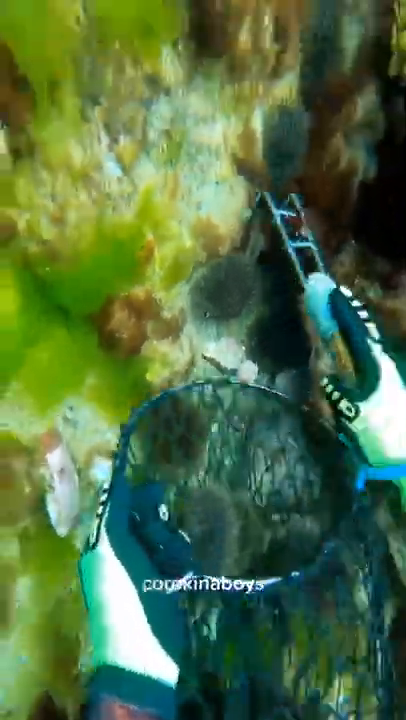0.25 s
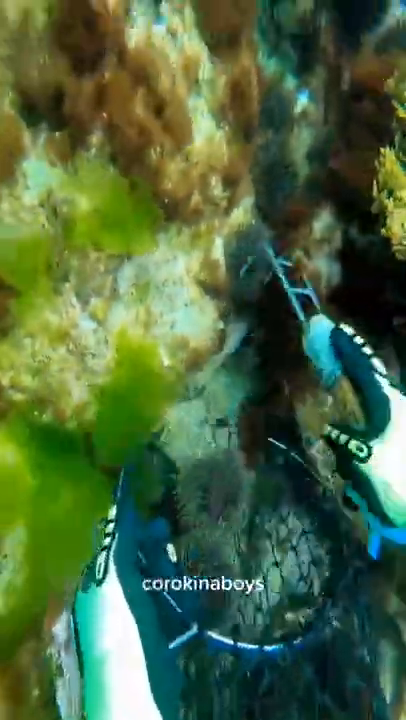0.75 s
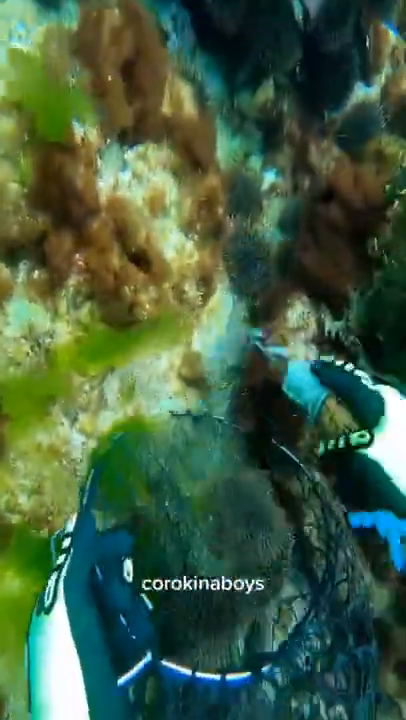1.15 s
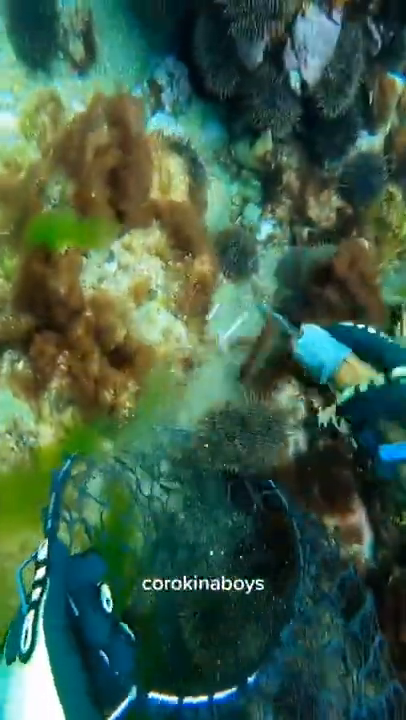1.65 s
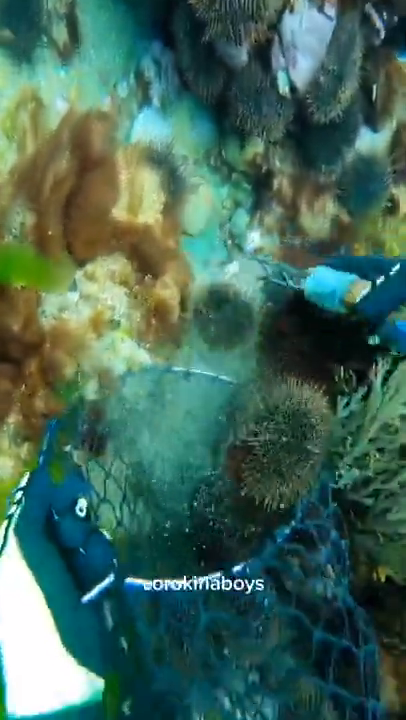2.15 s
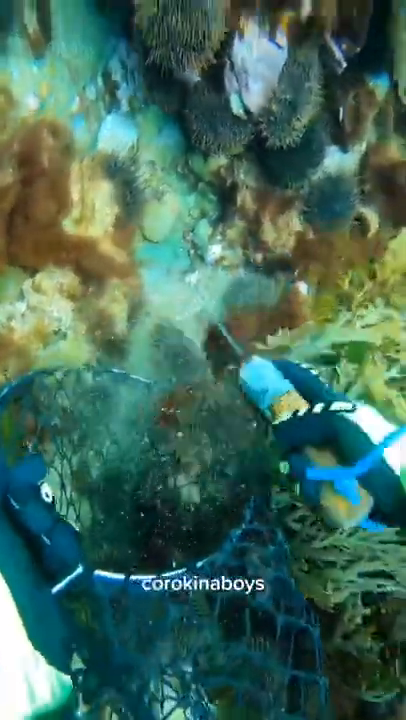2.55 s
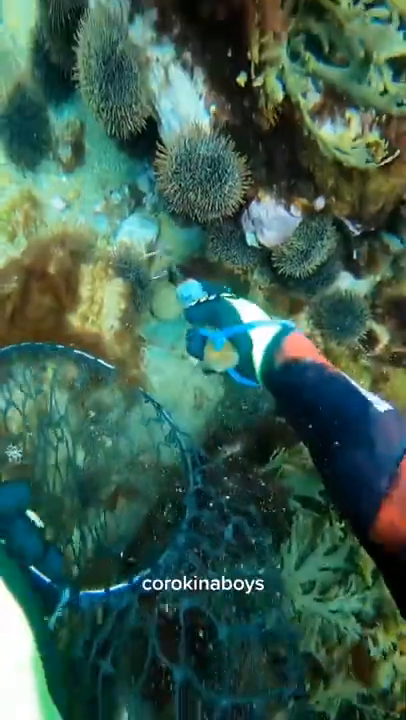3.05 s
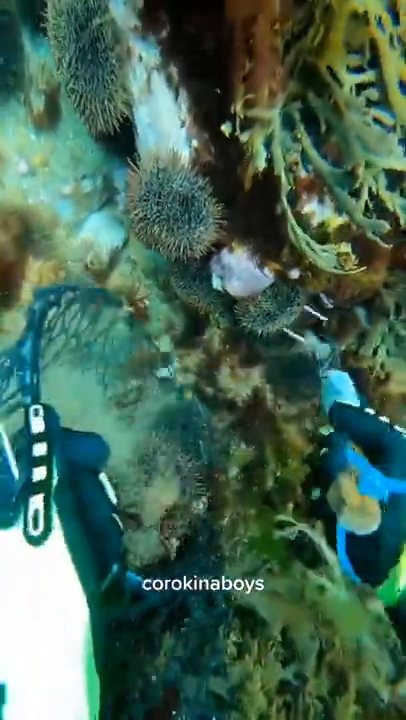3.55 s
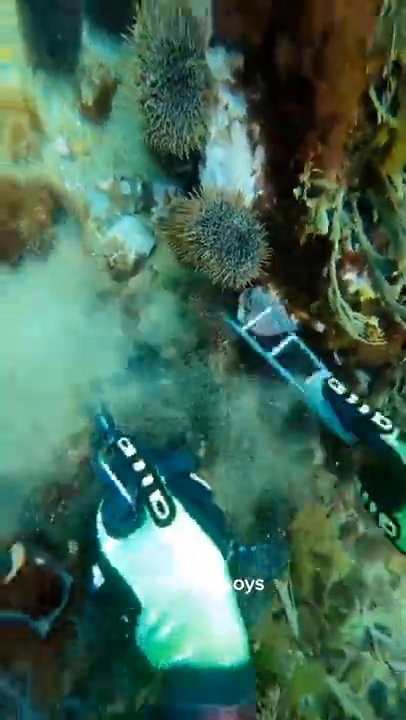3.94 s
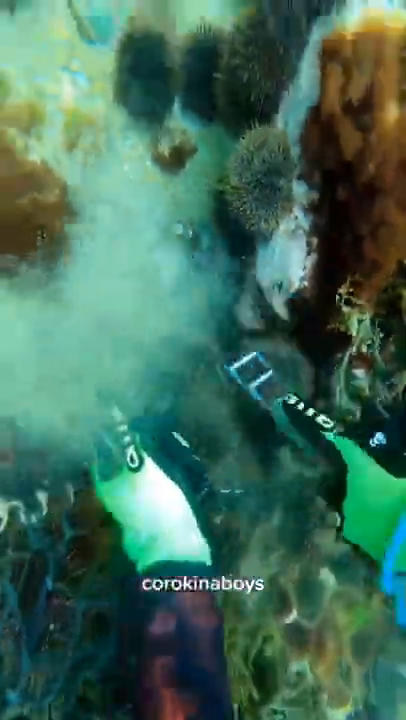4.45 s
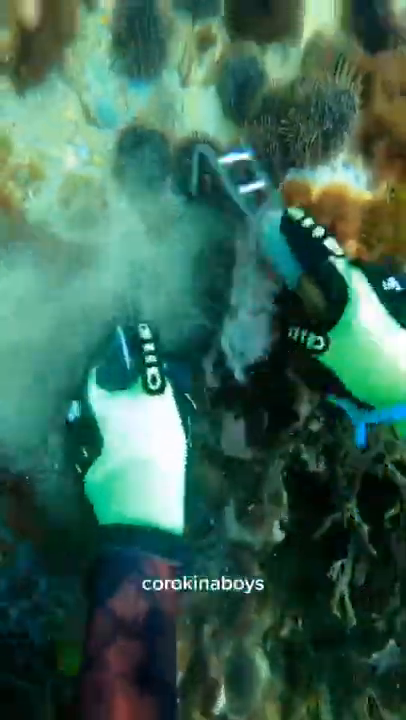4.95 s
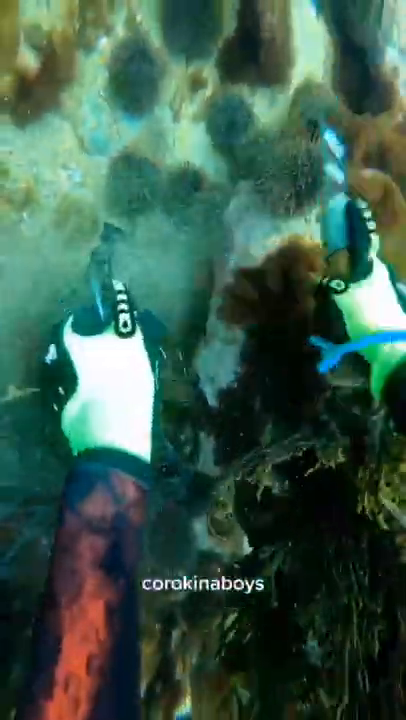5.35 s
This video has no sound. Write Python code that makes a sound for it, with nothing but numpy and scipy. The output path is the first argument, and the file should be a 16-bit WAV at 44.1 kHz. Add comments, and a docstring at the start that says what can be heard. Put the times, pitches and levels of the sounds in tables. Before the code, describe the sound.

Under water on a rocky reef, a steel hook rakes stone and levers urchins loose, heard close through a small sealed housing with two microphones. A thud and light ticks open it; from 0.4 to 0.75 s come clicks and a short coarse scrape. A faint longer rub follows at 0.9, with boomy knocks near 1.1 and a sharp click at 1.46. Scrapes and heavy bumps cluster at 2.0-2.2, then a knock with a loud bubble gulp at 2.7. After soft thumps around 3.0, a big thud and longer rasp hit at 3.25, with a click at 3.45. Forceful scraping bursts at 3.8-3.9, 4.3, 4.55, 4.9 and 5.25 carry deep thumps, ending on a hard knock at 5.55. Tiny bubble pops and rising blips dot the gaps. A muffled low swell rumbles unevenly throughout, surging more strongly after 4.2, under faint hiss.

```python
"""Rocky reef under water: a diver rakes a steel hook over rock and levers sea urchins into a net.
Scrapes and knocks are grains and noise driven through the resonances of a small sealed housing with two microphones.
Blows thud the housing as sagging sines; freed air gulps as short sines of climbing pitch.
Bubbles slipping in the ports pop: filtered pressure steps, smeared into quick chirps by an all-pass.
Swell on the membranes is resonant noise near 30 Hz under lumpy band noise."""
import sys
import numpy as np
from scipy import signal
from scipy.io import wavfile

SR = 44100
rng = np.random.default_rng(int(sys.argv[2]) if len(sys.argv) > 2 else 0)


def how_loud(loudness_db):
    """Turn decibels into a plain amplitude multiplier (0 dB gives 1, 20 dB gives 10)."""
    steps = np.asarray(loudness_db, float) / 20
    return 10 ** steps


def dump(signal):
    """Clip the signal to [-1, 1] and save it as 16-bit WAV at the path in sys.argv[1]."""
    limited = np.clip(np.atleast_2d(signal).T, -1, 1)
    pcm = np.round(limited * 32767).astype(np.int16)
    wavfile.write(sys.argv[1], SR, pcm)


N = 247401
MID_TO_LR = np.array([[1], [1]])
SIDE_TO_LR = np.array([[1], [-1]])


def rms_one(x):
    """Scale to rms 1."""
    return x / np.sqrt(np.mean(x ** 2) + 1e-20)


def drift(corner_hz):
    """Slow random wander of rms 1: noise through two equal poles, run at SR / 40."""
    r = np.exp(-2 * np.pi * corner_hz * 40 / SR)
    run_in = 2000
    noise = rng.standard_normal(N // 40 + 2 + run_in)
    slow = rms_one(signal.lfilter([1], [1, -2 * r, r * r], noise)[run_in:])
    return np.interp(np.arange(N) / 40, np.arange(len(slow)), slow)


def resonance(x, hz, width_hz):
    """Two-pole resonance, gain 1 on top."""
    r = np.exp(-np.pi * width_hz / SR)
    zeros = np.array([1, 0, -1]) * (1 - r * r) / 2
    poles = [1, -2 * r * np.cos(2 * np.pi * hz / SR), r * r]
    return signal.lfilter(zeros, poles, x)


def spread(mid, side, unlike):
    """Left and right from a common part and an opposed part."""
    return mid * MID_TO_LR + unlike * side * SIDE_TO_LR


# surge of the swell on the membranes: (time [s], level [dB])
SURGE = [(0.0, -31), (1.29, -28), (1.45, -35), (2.16, -26), (2.19, -34), (2.97, -28.5), (3.03, -37),
         (3.16, -25.5), (3.72, -39.5), (3.81, -25.5), (4.22, -33.5), (4.27, -17), (4.39, -32),
         (4.64, -20.5), (4.73, -31), (4.78, -23.5), (5.48, -27), (5.61, -19)]
# turbulence spectrum, relative: (frequency [Hz], density [dB per Hz])
CHURN_SPECTRUM = [(32, -30), (55, 5), (86, -2), (206, -5.5), (318, -37), (468, -22.5), (570, -33),
                  (704, -44), (900, -49), (1170, -62), (1980, -120)]


def swell(surge_unlike, churn_unlike, lumpy_db):
    """Surge near 30 Hz and lumpy turbulence above it, stirred by surge and working arm."""
    mean_churn_db, churn_per_surge = -35, 0.88    # share of the surge's dB swing
    stir_per_drag, stir_lag_s = 0.16, 0.016       # share of the drag's dB swing
    surge_db = np.interp(np.arange(N) / SR, *np.transpose(SURGE))
    r = np.exp(-1 / (stir_lag_s * SR))
    lagged_drag = signal.lfilter([1 - r], [1, -r], strokes()[0])
    drag_db = 20 * np.log10(lagged_drag + 1e-4)
    churn_db = mean_churn_db + churn_per_surge * (surge_db - surge_db.mean())
    churn_db += stir_per_drag * (drag_db - drag_db.mean())

    white = rng.standard_normal((3, 2, N + SR))    # one second of run-in
    rumble = resonance(resonance(white[2], hz=30, width_hz=19.7), hz=31.7, width_hz=21.3)
    mid, side = rms_one(rumble)[:, SR:]
    surge = spread(mid, side, surge_unlike)

    table_hz, table_db = np.transpose(CHURN_SPECTRUM)
    edges_hz = 55 * 2 ** np.arange(0, 4.1, .5)     # half octaves
    shared_lumps = drift(14)
    churn = np.zeros((2, N))
    for k, (low_hz, high_hz) in enumerate(zip(edges_hz, edges_hz[1:])):
        band = signal.butter(2, [low_hz, high_hz], "band", fs=SR, output="sos")
        mid, side = signal.sosfilt(band, white[k % 2])[:, SR:]
        density_db = np.interp(np.log(low_hz * high_hz) / 2, np.log(table_hz), table_db)
        lumps_db = lumpy_db * (shared_lumps + 0.48 * drift(17.6))
        churn += how_loud(density_db + lumps_db) * spread(mid, side, churn_unlike)
    return how_loud(surge_db) * surge + how_loud(churn_db) * rms_one(churn)


# air pockets shaken loose from net, rock and suit: (time [s], level [dB], starting pitch [Hz])
GULPS = [(0.016, -18.5, 500), (0.377, -23.5, 490), (0.4, -36, 477), (0.46, -44, 298), (0.486, -25, 470),
         (0.705, -41, 415), (0.878, -15.5, 410), (0.899, -21, 403), (1.117, -15, 348), (1.537, -25, 310),
         (2.098, -26, 400), (2.289, -34, 550), (2.389, -33, 510), (2.543, -35, 375), (2.707, -9.5, 535),
         (4.27, -40, 540), (4.431, -20, 360), (4.45, -18, 420), (4.625, -16.5, 370), (4.656, -20, 324),
         (4.857, -22.5, 436), (5.264, -15.5, 315)]


def gulps(t60_s, climb_per_s):
    """A freed bubble rings a few cycles, its pitch climbing as it rises."""
    out = np.zeros(N)
    t = np.arange(round(t60_s * SR)) / SR
    for start_s, level_db, hz in GULPS:
        i = round(start_s * SR)
        envelope = how_loud(level_db - 60 * t / t60_s) * (1 - np.exp(-t / 0.002))
        ring = envelope * np.sin(2 * np.pi * hz * (t + climb_per_s / 2 * t ** 2))
        out[i:i + len(t)] += ring[:N - i]
    return out


# bubbles slipping in a microphone port: (time [s], pressure step [dB], port [0 right, 1 front])
POPS = [(0.091, -6, 0), (0.1011, -12, 0), (0.246, -17.5, 1), (0.2905, -9, 0), (0.7715, -7, 0),
        (0.819, -13.5, 0), (0.851, -23.5, 0), (1.1737, -20, 0), (1.3843, -20.5, 1), (1.835, -10, 0),
        (2.4889, -23.5, 0), (2.641, -15, 0), (2.887, -20, 0), (2.937, -15, 0), (2.9424, -21, 0),
        (2.957, -16.5, 0), (3.0885, -16.5, 1), (3.1805, -9, 1), (3.2055, -16, 0), (3.8154, -11, 0),
        (4.435, -18, 1), (4.7813, -10.5, 0), (5.0308, -11.5, 0), (5.1246, -11.5, 0), (5.181, -7.5, 0),
        (5.4358, -13.5, 0), (5.5305, -10, 0), (5.6035, -22, 0)]
# two kinds of pop, by port: (rise [Hz], leak [Hz], all-pass smear [Hz], left gain [dB], right gain [dB])
POP_KINDS = [(1050, 87, 190, -12, 7), (1330, 44, 480, 0.5, -2.5)]


def pops(membrane_hz):
    """A pressure step leaks away; an all-pass smears it into a quick chirp, treble first, bass last."""
    out = np.zeros((2, N))
    for port, (rise_hz, leak_hz, smear_hz, left_db, right_db) in enumerate(POP_KINDS):
        steps = np.full(N, 1e-18)    # keeps the filters off denormals
        for start_s, step_db, where in POPS:
            if round(where) == port:
                steps[round(start_s * SR)] -= how_loud(step_db)
        leak = signal.butter(4, leak_hz, "high", fs=SR, output="sos")
        x = signal.sosfilt(leak, np.cumsum(steps))
        x = signal.lfilter(*signal.butter(1, rise_hz, fs=SR), x)
        x = signal.lfilter(*signal.butter(2, membrane_hz, fs=SR), x)
        r = np.exp(-2 * np.pi * smear_hz / SR)
        for _ in range(2):
            x = signal.lfilter([-r, 1], [1, -r], x)
        out += x * how_loud([[left_db], [right_db]])
    return out


# housing thuds as hook or net jolts the arms: (time [s], level [dB], settled pitch [Hz], t60 [s])
THUDS = [(0.009, -14.5, 178.6, 0.15), (0.462, -29, 215.5, 0.19), (0.51, -19, 126, 0.17),
         (0.6, -13.5, 123, 0.17), (0.63, -14.5, 170.5, 0.14), (0.674, -15, 177, 0.091),
         (0.732, -27, 78.5, 0.13), (0.88, -22.5, 89, 0.069), (0.949, -24.5, 197, 0.11),
         (1.073, -8.5, 102.6, 0.14), (1.112, -20, 125.2, 0.4), (1.132, -16.5, 85.4, 0.14),
         (1.177, -11.5, 99, 0.11), (1.546, -15, 96, 0.17), (1.621, -17, 144, 0.12), (1.648, -16, 155, 0.13),
         (2.016, -8.5, 86, 0.095), (2.062, -10.5, 187.5, 0.18), (2.098, -10, 165.3, 0.18),
         (2.147, -15, 89, 0.14), (2.2, -18, 170, 0.12), (2.722, -12.5, 110.5, 0.2),
         (2.977, -14.5, 108, 0.24), (2.998, -14, 93, 0.14), (3.216, -11.5, 201, 0.098),
         (3.246, -2.5, 98.7, 0.1), (3.306, -15, 100, 0.14), (3.804, -11.5, 93, 0.2),
         (3.841, -21, 122, 0.17), (3.88, -9, 119, 0.15), (3.992, -14, 102, 0.091), (4.26, -18, 114, 0.12),
         (4.31, -12.5, 106.2, 0.21), (4.351, -8, 86, 0.086), (4.451, -41, 80, 0.13),
         (4.542, -5, 167.4, 0.09), (4.569, -16.5, 127, 0.12), (4.629, -39, 81, 0.15),
         (4.892, -13.5, 115.3, 0.24), (4.938, -4.5, 82, 0.051), (5.249, -10.5, 180, 0.17),
         (5.287, -14.5, 93.3, 0.22), (5.552, -9, 112, 0.12)]


def thuds(rise_s, sag_s, second_db, pan_db):
    """Each jolt swings the housing a few cycles, pitch sagging as it settles; a second swing dies faster."""
    out = np.zeros(N)
    for start_s, level_db, hz, t60_s in THUDS:
        i = round(start_s * SR)
        t = np.arange(min(N - i, round(t60_s * SR))) / SR
        phase, second_phase = rng.random(2)
        cycles = hz * (t + sag_s * (1 - np.exp(-t / 0.044)))
        partner = 1.7 if hz < 140 else .6    # low and high swing: one leads, the other follows
        swing = np.sin(2 * np.pi * (cycles + phase))
        second = np.sin(2 * np.pi * (partner * cycles + second_phase))
        swing += how_loud(second_db - 39.0 * t / t60_s) * second
        out[i:i + len(t)] += how_loud(level_db - 60 * t / t60_s) * (1 - np.exp(-t / rise_s)) * swing
    return out * how_loud([[pan_db / 2], [-pan_db / 2]])


# hook over rock: (bite time [s], drag length [s], force [dB], sandiness [dB], weight [dB])
STROKES = [(0.005, 0.012, -50.5, -3.5, 4), (0.433, 0.0078, -44, -24, 5.5), (0.577, 0.017, -39, -5.5, 7),
           (0.673, 0.052, -34.5, -6.5, 1.5), (0.748, 0.012, -57, -33, 11), (0.89, 0.26, -59, -27, 8),
           (1.073, 0.046, -42.5, -5, 8.5), (1.185, 0.0031, -57, -13, -9), (1.35, .005, -65, -21, -10),
           (1.465, .005, -42.5, -17, -9), (1.54, 0.012, -59, -1, 10), (1.596, 0.0081, -53, 4, -5),
           (1.65, 0.085, -49, -7.5, -7), (2.072, 0.074, -51.5, -5, 8.5), (2.14, 0.028, -39.5, -7.5, 0),
           (2.21, 0.049, -49, -12, 3.5), (2.39, 0.15, -67.5, -5, 7), (2.545, 0.013, -54.5, -13, 15.5),
           (2.709, 0.066, -42.5, -4, 2), (2.86, 0.16, -58.5, -10, 3.5), (3.248, 0.16, -42, -11.5, -3.5),
           (3.455, .006, -46, -34, -3.5), (3.766, 0.022, -38, -11, 6.5), (3.842, 0.035, -34, -13.5, 0.5),
           (3.878, 0.016, -33.5, -16, 1), (3.99, 0.0068, -54, -1, 0), (4.079, 0.035, -60, 0, -18),
           (4.19, 0.017, -68, 10, -2), (4.263, 0.0067, -57.5, 8.5, 13), (4.307, 0.045, -34.5, -9, 1),
           (4.425, 0.018, -60, -12, -3), (4.542, 0.022, -35, -5, 1.5), (4.59, 0.028, -42.5, -13, 5),
           (4.69, 0.01, -50, -14, -3), (4.892, 0.045, -33, -6.5, -5.5), (5.011, 0.037, -48, -12.5, 5),
           (5.237, 0.042, -36, -11.5, -6), (5.33, 0.092, -55, -21, -3), (5.482, 0.026, -52, -17, 1),
           (5.551, .06, -41, -8.5, 0.5)]
# hook brushing rock between strokes, one per resonance family: force [dB]
RESTING_DB = [-59.5, -60, -67.5, -80, -59]


def strokes():
    """Drag force per resonance family: every stroke bites, drags, lifts and trails off."""
    bite_db_per_s = 1497 * np.array([[1], [1], [1], [1.5], [1]])    # finest grit sets in faster
    lift_db_per_s = 380
    trail_db, trail_db_per_s = -27.5, 75    # loosened sand and spines keep trickling
    t = np.arange(N) / SR
    force = how_loud(RESTING_DB)[:, None] * np.ones(N)
    for bite_s, drag_s, force_db, sand_db, weight_db in STROKES:
        first = max(0, round(bite_s * SR) - SR // 8)
        near = slice(first, round((bite_s + drag_s) * SR) + SR // 2)
        before_s = np.maximum(bite_s - t[near], 0)
        after_s = np.maximum(t[near] - bite_s - drag_s, 0)
        fall = how_loud(-lift_db_per_s * after_s) + how_loud(trail_db - trail_db_per_s * after_s)
        shape = how_loud(-bite_db_per_s * before_s) * fall
        bright_db = 2 + 0.54 * sand_db    # a sandier drag also rings brighter
        shares_db = np.array([0, weight_db, bright_db, sand_db, weight_db - 4])
        force[:, near] += how_loud(force_db + shares_db)[:, None] * shape
    return force


# hook strikes, spines snapping: (time [s], force [dB], weight [dB], sharpness [dB], t60 [s])
KNOCKS = [(0.0136, -46.5, 19, 27, 0.015), (0.117, -52.5, -6, 13.5, 0.033), (0.306, -51, 15.5, -9, 0.063),
          (0.4337, -17.5, -5, -12, 0.017), (0.4613, -52, 21, -26, 0.077), (0.5782, -39.5, -2, 15, 0.043),
          (0.595, -22, 4, 0.5, 0.028), (0.6729, -27.5, 10.5, 6.5, 0.029), (0.7534, -33, 3, -22, 0.054),
          (0.9018, -47, 12, 13.5, 0.035), (0.9142, -32.5, -11, -13, 0.038), (0.9457, -41, -1, -21, 0.14),
          (1.0304, -30.5, -16, -9, 0.033), (1.072, -24, 7, -3.5, 0.057), (1.1111, -25.5, 8, 1.5, 0.097),
          (1.1819, -16.5, 1.5, -0.5, 0.02), (1.3475, -35.5, 0, 6, 0.013), (1.4633, -18, -1, -15.5, 0.045),
          (1.5369, -33.5, 11, 7.5, 0.072), (1.5953, -34.5, 6.5, -5, 0.083), (1.6448, -22.5, -5, -2, 0.02),
          (1.703, -36, 3.5, -2.5, 0.031), (1.8095, -36, -10, -19, 0.014), (1.965, -43, -14, -21, 0.02),
          (2.003, -57, -14, 6, 0.018), (2.0373, -35, 8.5, -7, 0.021), (2.067, -30.5, 6.5, -1.5, 0.11),
          (2.0956, -32, 13.5, -5, 0.021), (2.1395, -41.5, -19, 11, 0.16), (2.1727, -40.5, 9, 4, 0.076),
          (2.1927, -20.5, -8, 3.5, 0.014), (2.228, -32, -28, 2, 0.054), (2.3202, -54, -18, 25.5, 0.021),
          (2.3861, -40.5, 3.5, 0, 0.033), (2.463, -51, 0, 11.5, 0.02), (2.5431, -29.5, 5.5, -11, 0.065),
          (2.6326, -29, -11, -1, 0.043), (2.7059, -26, 4, -9, 0.052), (2.7196, -16, -3.5, -2, 0.032),
          (2.7812, -35, 2.5, -21, 0.043), (2.8567, -39.5, 6.5, -9, 0.046), (3.2411, -27, 9, -4, 0.036),
          (3.2812, -27.5, 3.5, 8.5, 0.024), (3.3038, -39, 7, 13, 0.023), (3.389, -31.5, -6, 7, 0.03),
          (3.4509, -16, -0.5, -11, 0.024), (3.494, -42, -10, -5, 0.018), (3.5788, -26, -6.5, -14, 0.039),
          (3.7592, -27.5, 0, 1, 0.11), (3.7814, -26, -1, -5, 0.02), (3.8017, -15.5, -6, 0.5, 0.027),
          (3.8758, -17.5, -1, -4, 0.055), (3.8987, -30, 10, -12, 0.064), (3.935, -42, -14, 9, 0.018),
          (3.991, -45, 20, 14, 0.035), (4.12, -53, -17, 2, 0.016), (4.14, -62, -22, 2, 0.013),
          (4.1928, -35.5, -10, -3, 0.013), (4.2665, -38, 16, 6, 0.03), (4.3029, -22, 2, -15, 0.036),
          (4.348, -24.5, -2.5, -9, 0.069), (4.4234, -60, 12, -16, 0.4), (4.5409, -11.5, -6, -4.5, 0.026),
          (4.5455, -25, 4.5, -11, 0.09), (4.579, -38, -10, 5, 0.029), (4.6052, -21, -23, -4.5, 0.022),
          (4.8871, -25.5, 5.5, -6, 0.085), (4.9056, -38, 14, 13, 0.092), (5.01, -31.5, 3.5, -14, 0.049),
          (5.1735, -35.5, 6.5, -5, 0.024), (5.236, -41.5, 12.5, 10, 0.097), (5.2473, -14.5, -1, -8, 0.017),
          (5.4819, -31.5, -7, -21, 0.073), (5.553, -12, -2.5, 4.5, 0.023)]


def contact():
    """Hook force per resonance family: sticking and slipping drag plus decaying knocks."""
    force = strokes() * how_loud(3.44 * drift(28) + 3.53 * drift(89))
    for start_s, force_db, weight_db, sharp_db, t60_s in KNOCKS:
        i = round(start_s * SR)
        t = np.arange(min(N - i, round(t60_s * SR))) / SR
        body_db = -10 + 1.82 * weight_db    # weight rings the body even more than the hollow
        shares_db = np.array([0, weight_db, sharp_db, -36, body_db])
        force[:, i:i + len(t)] += how_loud(force_db + shares_db[:, None] - 60 * t / t60_s)
    return force


def grit(grains_per_s, spread_db, bed):
    """Rock and spine grains catch the steel: random clicks over fine noise; rows mid, side."""
    sizes = how_loud(spread_db * np.minimum(rng.exponential(1, (2, N)), 4))
    signs = rng.choice([-1, 1], (2, N))
    caught = rng.random(N) < grains_per_s / SR
    clicks = rms_one(sizes * signs * caught)
    return rms_one(clicks + bed * rng.standard_normal((2, N)))


# housing resonances by family, in the order of the force rows:
# (frequency [Hz], width [Hz], level [dB], left re right [dB], left-right unlikeness [0-1])
HOUSING = { "grind": [(2084, 114, -21, -2, 0.57), (2900, 890, -4, 3.5, 0.25), (3640, 440, -11.5, 5.5, 0.44),
           (4360, 200, -22, -2, 0.84)], "hollow": [(1069, 430, -7.5, 2, 0.29), (1340, 190, -10.5, -1.5, 0),
           (1511, 161, -6.5, 0, 0.23)], "bright": [(5549, 605, -6, -13.5, 0.33),
           (6330, 160, -16, -6.5, 0.7), (6970, 176, -23, -12, 0.84)], "grit": [(8200, 2900, -9, -4, 0.8),
           (11050, 2300, -8.5, -2.5, 0.77), (12600, 1500, -16.5, -4, 0.6)],
           "body": [(239.5, 130, -4, -3.5, 0.23), (412, 268, -2.5, -2, 0.09), (544, 224, -8, 3.5, 0.3)]}
# hiss drive, one per resonance family: level [dB]
HISS_DB = [-62, -61, -62.5, -75, -72]


def hook():
    """The gritty force rings the housing; each resonance reaches the two ports unequally."""
    force = contact()
    grains = [grit(grains_per_s=900, spread_db=5.0, bed=0.98),
              grit(grains_per_s=900, spread_db=4.0, bed=0.91)]
    touches = [round(row[0] * SR) for row in KNOCKS]
    for grain in grains:
        grain[0, touches] += how_loud(15.5)    # first touch of a knock: one hard grain
    hiss = rng.standard_normal((2, 2, N))    # smooth water hiss, coloured by the housing
    out = np.zeros((2, N))
    for push, hiss_db, family in zip(force, HISS_DB, HOUSING.values()):
        for k, (hz, width_hz, level_db, pan_db, unlike) in enumerate(family):
            grip = how_loud(3.35 * drift(15.6))    # where and how the hook bites picks the resonances
            drive = grip * (grains[k % 2] * push + how_loud(hiss_db) * hiss[k % 2])
            once = resonance(drive, hz, width_hz)
            # stiff walls keep the valleys between resonances deep
            mid, side = resonance(once, hz, 0.88 * width_hz)
            gain = how_loud(level_db + np.array([[.5], [-.5]]) * pan_db)
            gain = gain * np.sqrt(SR / (np.pi * width_hz))    # makes up for narrowness
            out += gain * spread(mid, side, unlike)
    return out


def scene():
    """All sources at the two microphones."""
    scrapes = hook()
    blows = thuds(rise_s=0.0027, sag_s=0.00182, second_db=-4.0, pan_db=-2.0)
    air = pops(membrane_hz=5000) + gulps(t60_s=0.025, climb_per_s=7.2)
    water = swell(surge_unlike=0.22, churn_unlike=0.26, lumpy_db=4.5)
    return scrapes + blows + air + water


def top_cut(x):
    """Nothing passes above the cut-off."""
    return signal.sosfilt(signal.butter(12, 15730, fs=SR, output="sos"), x)


def record(dry):
    """Peaks are gently rounded by a tanh curve."""
    mix = 0.91 * np.tanh(dry / 0.92)
    return top_cut(mix)


dry = scene()
out = record(dry)
dump(out)
```